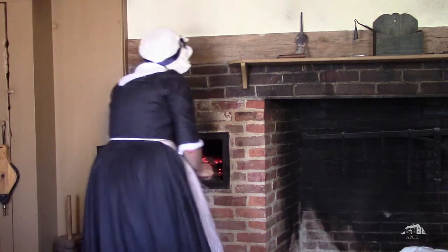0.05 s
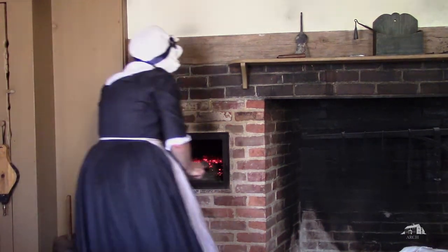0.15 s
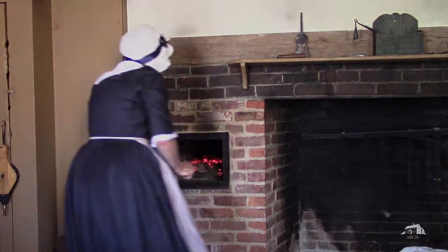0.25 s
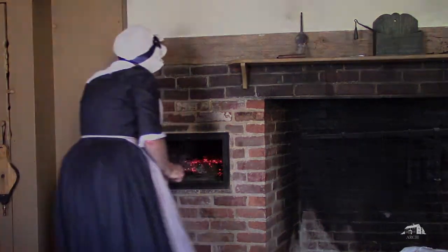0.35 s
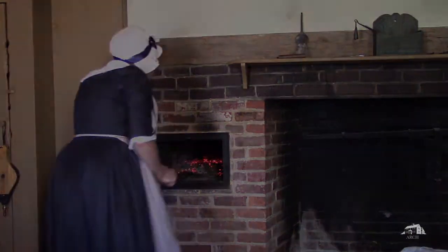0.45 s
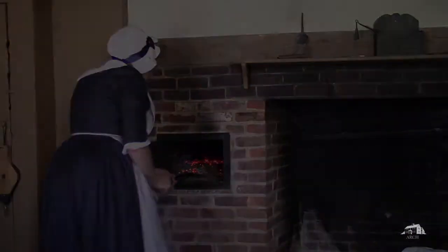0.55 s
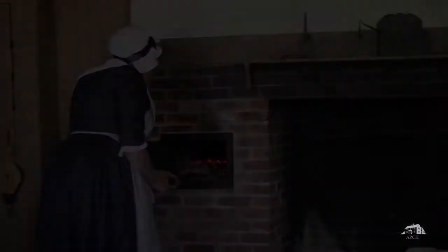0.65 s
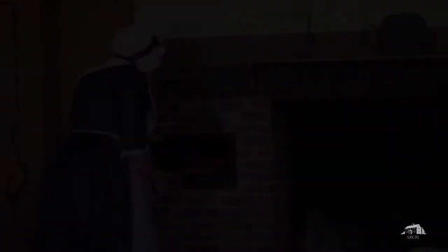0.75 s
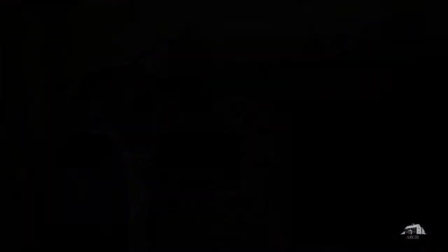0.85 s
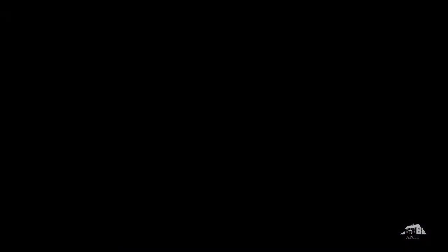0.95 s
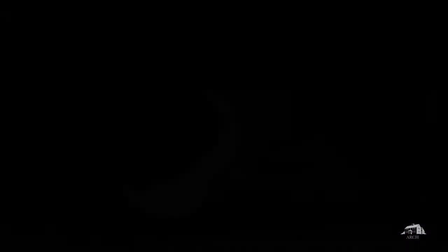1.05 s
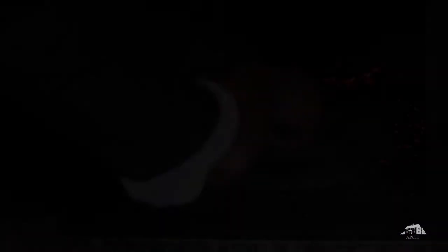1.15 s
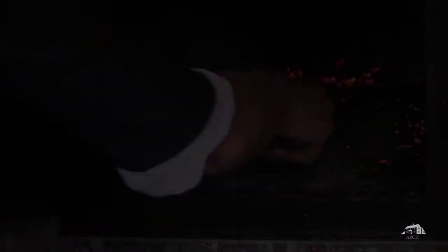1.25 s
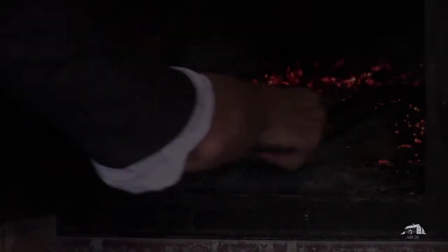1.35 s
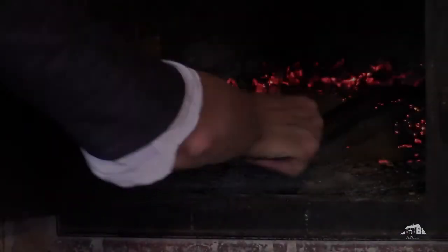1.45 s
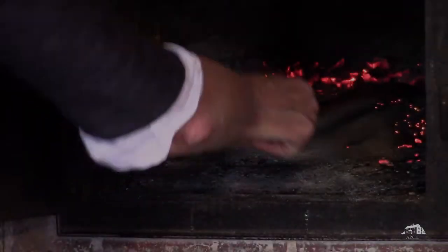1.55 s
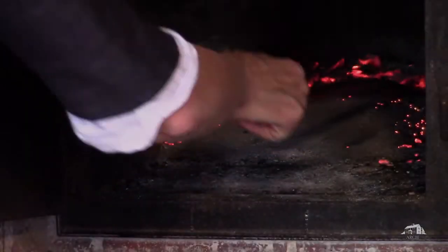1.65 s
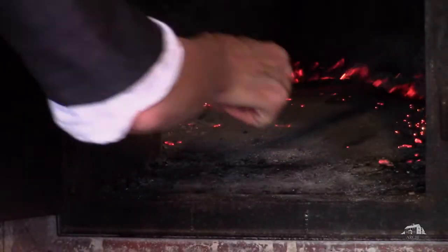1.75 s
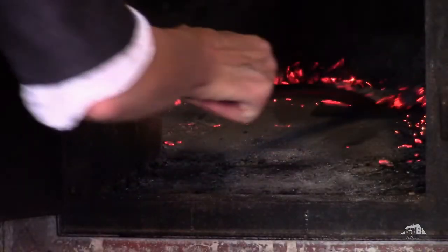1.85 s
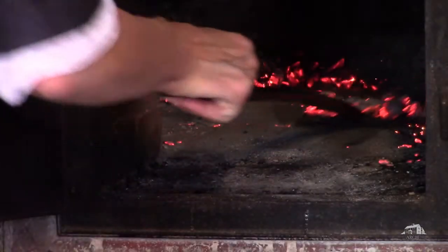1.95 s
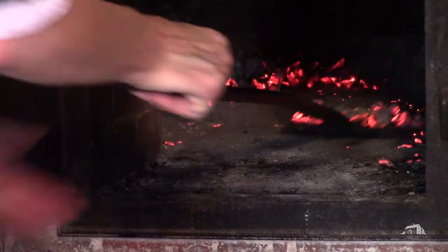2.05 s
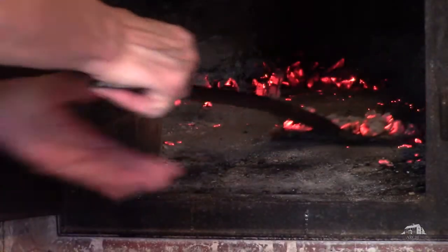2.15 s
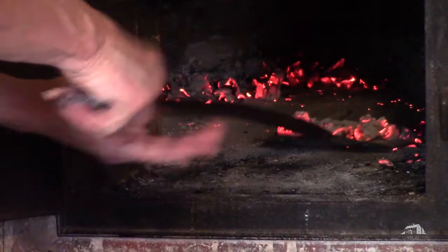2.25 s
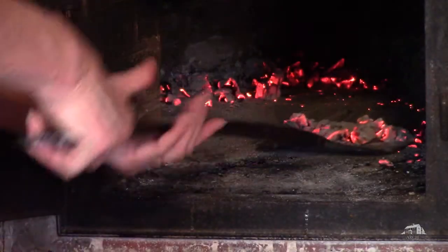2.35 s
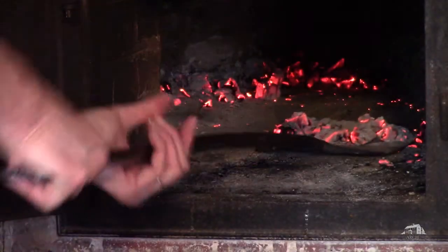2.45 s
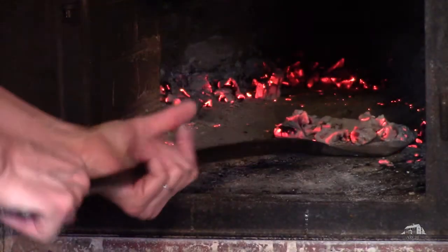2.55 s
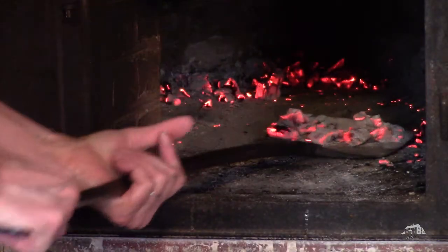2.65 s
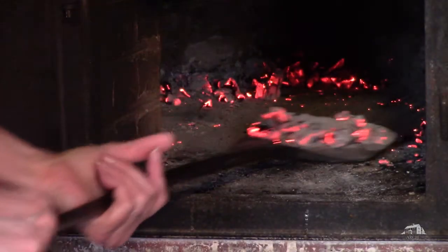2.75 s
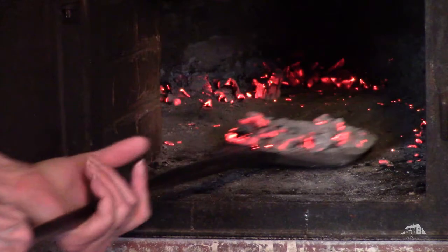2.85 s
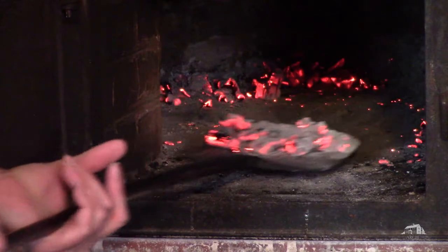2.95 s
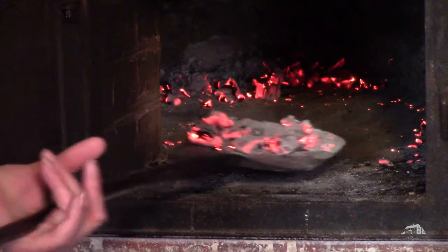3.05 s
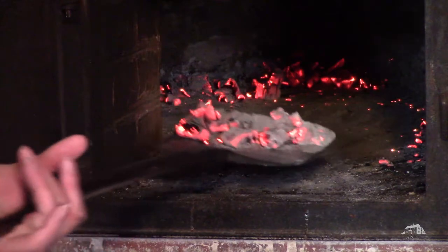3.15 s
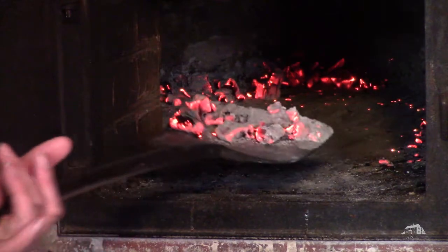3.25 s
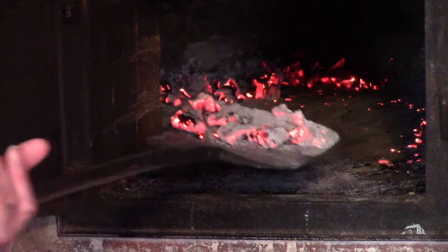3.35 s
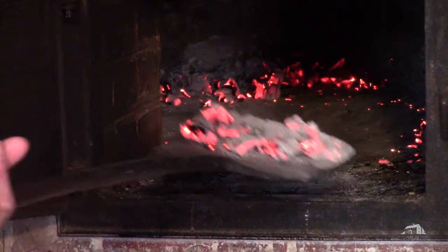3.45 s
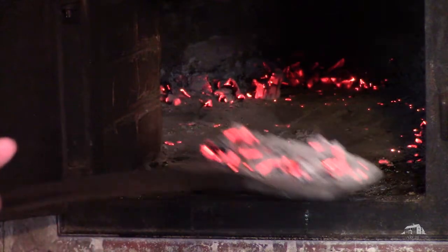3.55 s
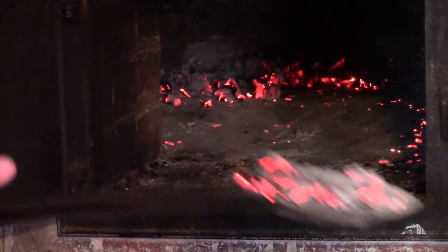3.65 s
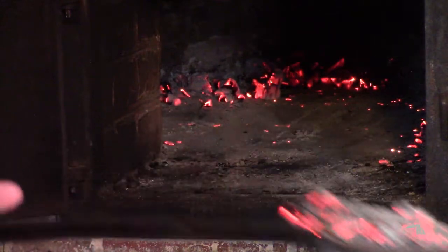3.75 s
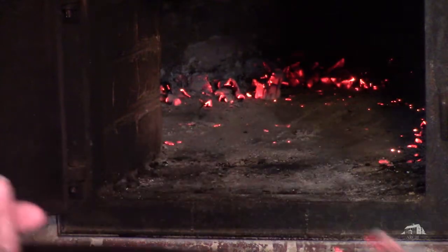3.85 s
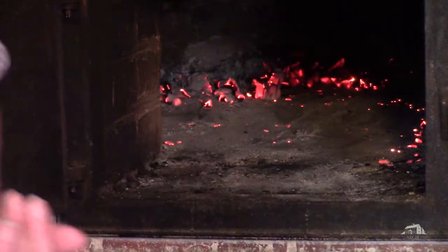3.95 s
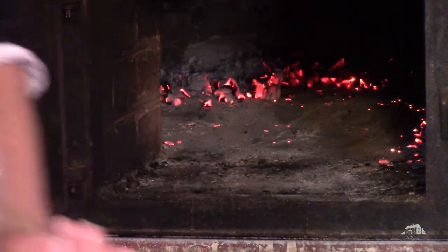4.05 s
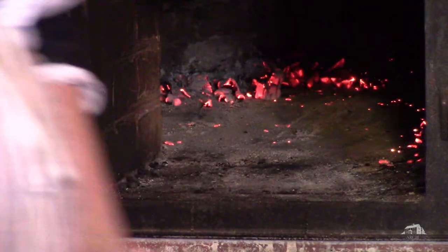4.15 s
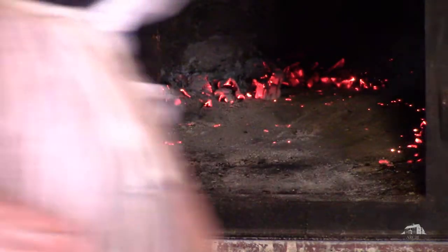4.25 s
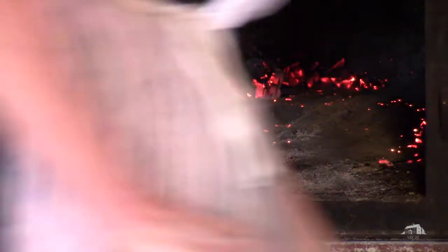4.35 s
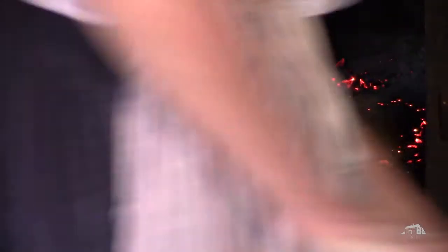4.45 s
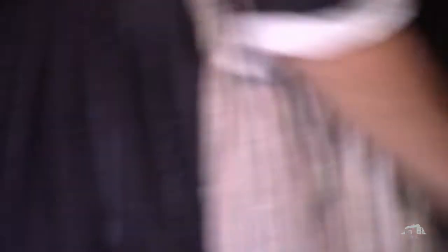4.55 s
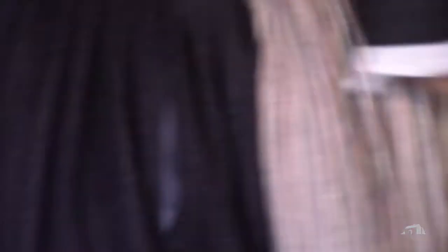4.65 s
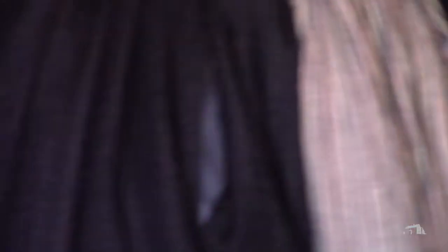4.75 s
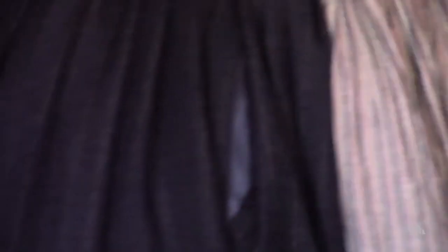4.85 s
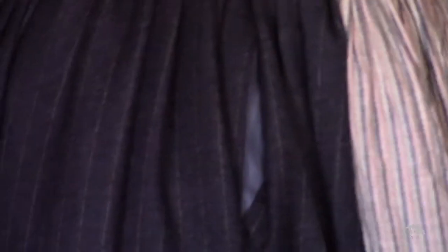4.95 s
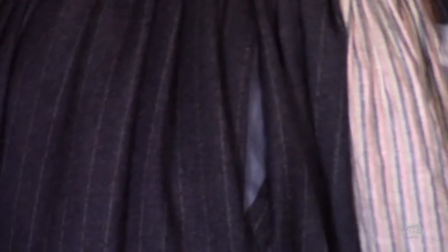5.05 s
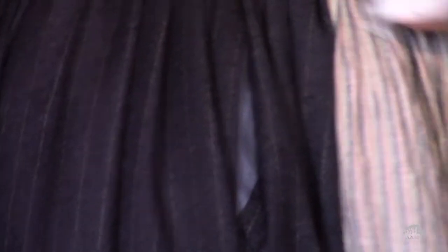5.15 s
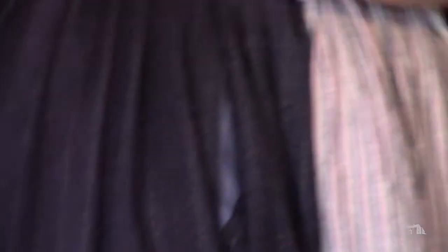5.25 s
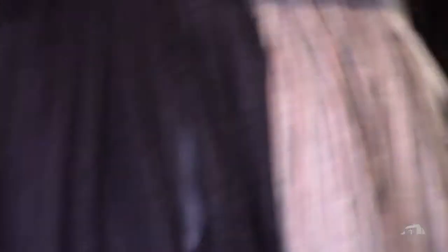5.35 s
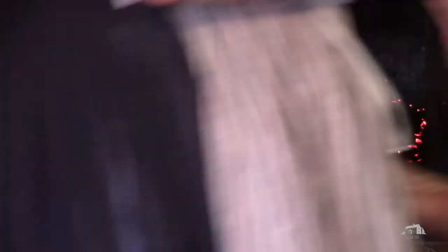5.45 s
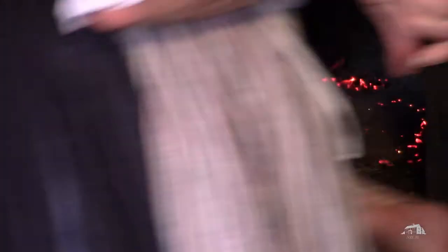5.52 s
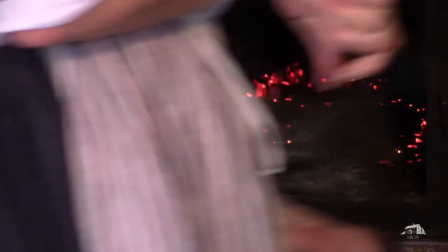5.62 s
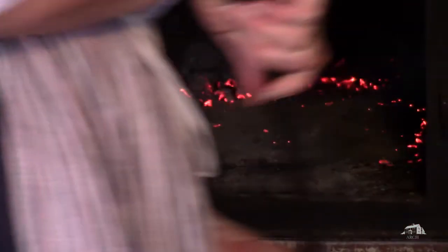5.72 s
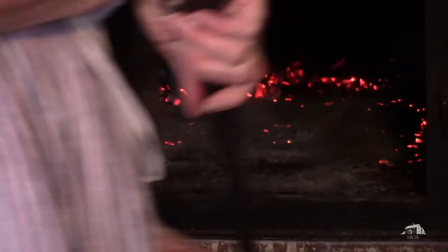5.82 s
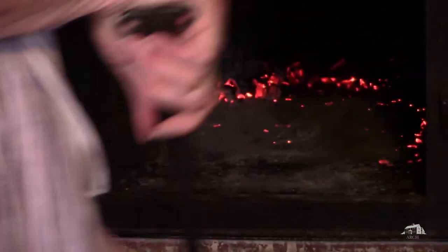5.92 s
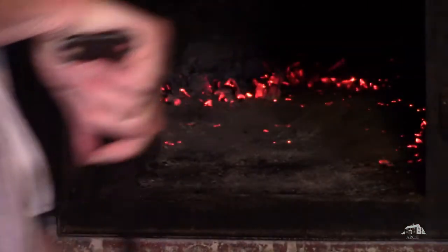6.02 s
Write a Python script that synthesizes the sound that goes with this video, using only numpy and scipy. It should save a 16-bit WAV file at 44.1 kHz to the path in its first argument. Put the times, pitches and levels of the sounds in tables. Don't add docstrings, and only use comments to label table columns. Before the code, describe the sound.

An iron peel bangs onto oven brick, scrapes grittily under hot coals in a long ringing shove, then footsteps thud and embers crackle.

```python
import sys
import numpy as np
from scipy import signal
from scipy.fft import rfft, irfft, next_fast_len
from scipy.io import wavfile
from scipy.ndimage import uniform_filter1d

SR = 44100
rng = np.random.default_rng(int(sys.argv[2]) if len(sys.argv) > 2 else 0)


def boost(x):
    u = np.asarray(x, float) / 20
    return 10 ** u


def store_pcm(level_fs):
    pcm = np.round(np.clip(level_fs, -1, 1) * 32767).astype(np.int16)
    wavfile.write(sys.argv[1], SR, np.atleast_2d(pcm).T)


N = 268128
LIFTED = 3 * SR
STRIDE = 6
RISE_DB = 20
LANDING_S = 0.003


def unit(x):
    return x / np.sqrt(np.mean(x ** 2) + 1e-20)


def along(points, hz):
    f, v = np.transpose(points)
    return np.interp(np.log(hz + 1), np.log(f + 1), v)


def wobble(rate_hz, size=N):
    knots = rng.standard_normal(int(size * rate_hz / SR) + 4)
    return np.interp(np.arange(size) * rate_hz / SR, np.arange(len(knots)), knots)


def coloured(x, points):
    m = next_fast_len(len(x) + 8192)
    gain = boost(along(points, np.fft.rfftfreq(m, 1 / SR)))
    return irfft(rfft(x, m) * gain, m)[:len(x)]


def resonate(x, hz, width_hz):
    b, a = signal.iirpeak(hz, hz / width_hz, SR)
    return signal.lfilter(b, a, signal.lfilter(b, a, x))


def no_bass(x, order, hz):
    return signal.sosfilt(signal.butter(order, hz, "high", fs=SR, output="sos"), x)


def grains(clump_db, spike_db, size=N):
    weight = boost(clump_db * wobble(250, size) + spike_db * rng.exponential(size=size))
    return unit(weight * rng.standard_normal(size))


def decay(length, t60_s):
    return boost(-60 * np.arange(length) / SR / max(t60_s, 1e-3))


def pushes(rows, size=N):
    s, db, rise, t60 = np.transpose(rows)[:4, :, None]
    t = np.arange(0, size, STRIDE) / SR
    age = t - s
    landed = np.where((rise < LANDING_S) & (s < s.T), s - rise, 0).max(0)[:, None]
    slope = np.where(age < 0, RISE_DB / np.maximum(rise, 1e-4), -60 / np.maximum(t60, 1e-3))
    level_db = np.where(t < landed, -150, np.maximum(db + slope * age, -150))
    power = boost(level_db) ** 2
    total = power.sum(0)
    return np.sqrt(total), power / total, np.maximum(age, 0)


# peak t/s, drag level/dB, rise/s, fade t60/s, weight on the brick/dB
PROBE_PUSHES = [(0.312, -21, 0.00091, 0.22, 1.5), (0.391, -30.5, 0.014, 0.62, -3.5),
                (0.689, -49, 0.017, 0.28, -22), (0.78, -54, 0.074, .1, -7),
                (0.874, -18.5, 0.002, 0.17, -13), (0.942, -27.5, 0.022, 0.21, -9.5),
                (1.0, -42, 0.022, 0.89, -2.5), (1.113, -38.5, .001, 0.47, -2.5),
                (1.176, -39, 0.022, 0.27, -2), (1.258, -49, 0.043, 0.71, -2),
                (1.442, -31, 0.0011, 0.033, -9), (1.601, -48.5, 0.12, 1.2, 11),
                (1.727, -36.5, 0.49, 0.25, -5.5), (1.805, -35.5, 0.14, 0.25, -0.5)]
# peak t/s, drag level/dB, rise/s, fade t60/s, weight on the brick/dB
SHOVE_PUSHES = [(1.811, -31.5, .001, 0.94, 1), (1.833, -29, 0.001, 0.56, 0.5), (1.847, -24, .012, .3, -10),
                (1.9, -31, 0.034, 0.63, -4.5), (1.992, -12, 0.00079, 0.077, -10.5),
                (2.002, -25, 0.0055, 1.37, -2), (2.077, -18, 0.11, 0.17, -7), (2.141, -14, 0.068, 0.07, -7),
                (2.15, -26.5, .02, 0.37, -3), (2.177, -20, .001, 0.71, -7),
                (2.355, -18.5, 0.27, 0.19, -3.5), (2.41, -32, 0.033, 0.45, -11),
                (2.569, -30.5, 0.00088, 0.1, -9), (2.648, -34, .001, .1, -19), (2.66, -37, 0.002, 0.15, -3),
                (2.684, -42, 0.022, .15, 1.5), (2.71, -49, .03, 0.24, 2)]
PEEL_PUSHES = PROBE_PUSHES + SHOVE_PUSHES


def contact():
    settle_db, settle_s = 3.5, 0.022
    keen_db, dull_db, dull_s = -8, -1, 0.005
    keen_per_weight = -0.37
    lift_s, lift_db_per_s = 2.86, 113
    effort, share, age = pushes(PEEL_PUSHES, LIFTED)
    push_weight_db = np.transpose(PEEL_PUSHES)[-1, :, None]
    settled_db = push_weight_db + settle_db * (1 - np.exp(-age / settle_s))
    weight_db = (share * settled_db).sum(0)
    dulled = (share * (1 - np.exp(-age / dull_s))).sum(0)
    edge_db = keen_db + keen_per_weight * weight_db + dull_db * dulled
    effort, weight_db, edge_db = np.repeat([effort, weight_db + 0.5, edge_db + 4.5], STRIDE, 1)
    since_lift_s = np.maximum(np.arange(LIFTED) / SR - lift_s, 0)
    return effort * boost(-lift_db_per_s * since_lift_s), weight_db, edge_db


def shade(hz, weight_db, edge_db):
    low = np.clip(np.log2(2600 / hz), 0, 1)
    high = np.clip(np.log2(hz / 7000) / 0.5, 0, 1)
    return low * weight_db + high * edge_db


# t/s, peak level/dB
BLADE_JOLTS = [(0.312, 2), (0.381, -25), (0.575, -29), (0.875, -5), (0.9365, -30), (1.039, -24),
               (1.0693, -29), (1.173, -16.5), (1.256, -25.5), (1.5838, -20.5), (1.8137, -12),
               (1.833, -11.5), (1.8466, 1.5), (1.945, -7), (2.038, -11), (2.057, -9), (2.068, -10),
               (2.097, -2), (2.125, -5.5), (2.178, -2.5), (2.578, -23), (2.661, -29)]
# f/Hz, level/dB
SHAFT_MODES = [(301, -16.5), (388, -15), (473, -8), (624, -10.5), (829, -15.5), (1082, -13.5), (1184, -8.5),
               (1345, -4), (1485, -7), (1679, -5.5), (1754, -1.5), (2062, -5), (2142, -10), (2282, -10),
               (2454, -7), (2616, -6.5), (2863, -8.5)]
BLADE_MODES = [(3025, -10), (3348, -6.5), (3757, -5), (3940, -6.5), (4231, -6.5), (4306, -10.5),
               (4715, -10), (5372, -11), (5673, -4.5), (5921, -6.5), (6029, -7), (6513, -33), (6664, -12),
               (6933, -12.5), (7181, -33), (7590, -10), (7930, -11), (8225, -36), (8559, -16.5),
               (8764, -12.5), (9216, -9.5), (9668, -11), (10023, -17.5), (10260, -31), (11111, -15),
               (11649, -16.5), (11983, -23), (13016, -19), (13320, -24), (14330, -26)]
RIM_MODES = [(10250, -17.5), (10620, -19), (11400, -36), (12400, -35), (13200, -34), (13740, -28),
             (14000, -29), (14944, -27), (15288, -27), (15430, -32), (12420, -25), (9000, -28),
             (4900, -12.5), (4695, -18.5)]
# f/Hz, density/dB per Hz
GRIT_SPECTRUM = [(200, -15), (400, -2), (1000, 5.5), (2500, -1.5), (5000, -4.5), (8000, -9), (11000, -10),
                 (16000, -37)]


def peel():
    effort, weight_db, edge_db = contact()
    drag = effort * boost(0.99 * wobble(34.99, LIFTED))
    knock = decay(SR // 8, 0.053)
    jolts = [(round(s * SR), boost(db - 16.0) * knock) for s, db in BLADE_JOLTS]

    grit = grains(clump_db=2.0, spike_db=1.36, size=LIFTED)
    ring = 0
    for hz, db in SHAFT_MODES + BLADE_MODES + RIM_MODES:
        coupling_db = np.minimum(3.6 * wobble(36.03, LIFTED), 4.5)
        push = drag * boost(coupling_db)
        for start, burst in jolts:
            push[start:][:len(burst)] += burst * boost(rng.normal(0, 1.9))
        force = push * boost(shade(hz, weight_db, edge_db)) * grit
        width_hz = 46 + 0.0053 * hz
        ring = ring + boost(db + 12.0) * resonate(force, hz, width_hz)

    push = drag.copy()
    for start, burst in jolts:
        push[start:][:len(burst)] += 2.17 * burst * decay(len(burst), 0.02)
    rasp = unit(coloured(grains(clump_db=4.0, spike_db=1.8, size=LIFTED), GRIT_SPECTRUM))
    low = coloured(rasp, [(1500, 0), (2600, -60)])
    high = coloured(rasp, [(7000, -60), (10000, 0)])
    rasp = rasp + low * (boost(weight_db) - 1) + high * (boost(edge_db) - 1)
    return np.pad(ring + boost(-7.0) * push * rasp, (0, N - LIFTED))


# peak t/s, rms level/dB, f/Hz, length/s
CATCH_SONGS = [(0.314, -20.5, 5680, 0.028), (0.325, -21, 516.6, 0.012), (0.326, -25, 1742, 0.059),
               (0.886, -32, 3940, 0.04), (0.878, -24, 2604, 0.013), (0.947, -32.5, 5680, 0.047),
               (0.963, -31, 3954, 0.041), (1.18, -38.5, 1668, 0.033), (1.181, -37.5, 820, 0.02),
               (1.597, -40, 4320, 0.034), (1.602, -45, 814, 0.1), (1.612, -46, 1180, 0.11),
               (1.624, -47.5, 1770, 0.17), (1.678, -42.5, 1462, 0.047), (1.845, -24.5, 1493, 0.048),
               (1.844, -22, 1753, 0.031), (1.86, -22.5, 5640, 0.042), (1.917, -34, 1724, 0.18),
               (1.999, -23, 5680, 0.02), (2.075, -17.5, 5670, 0.047), (2.08, -20.5, 3943, 0.042),
               (2.136, -22, 6540, 0.02), (2.181, -27, 5680, .021), (2.235, -33, 5950, 0.045),
               (2.302, -32.5, 4750, 0.082), (2.303, -30, 3320, .035), (2.351, -27.5, 8760, 0.026),
               (2.365, -29, 5940, 0.048), (2.366, -29.5, 4220, 0.056)]
# peak t/s, rms level/dB, f/Hz, length/s
MORE_SONGS = [(0.319, -22.5, 1327, 0.036), (0.32, -34, 2070, 0.056), (0.349, -36, 379, 0.045),
              (0.345, -24.5, 1340, 0.053), (0.397, -39.5, 5680, 0.049), (0.398, -41, 3940, 0.058),
              (1.839, -29, 1238, .03), (1.84, -33.5, 850, .025), (1.856, -30.5, 798, 0.06),
              (1.996, -29, 2290, 0.023), (2.037, -35, 750, 0.056), (2.106, -30, 1180, .03),
              (2.22, -32, 1294, 0.083), (2.26, -32.5, 1750, 0.07), (1.949, -33, 5650, 0.038),
              (2.131, -21, 8700, 0.016), (2.68, -49, 4300, 0.026), (0.526, -48.5, 7950, 0.025),
              (0.691, -52, 2630, 0.03), (0.702, -52, 476, .038), (0.935, -44, 309.3, 0.041),
              (1.333, -54.5, 828, 0.039), (1.465, -49.5, 2610, 0.041), (1.467, -54, 1330, 0.06),
              (1.781, -51, 822, 0.046), (2.586, -46, 4300, 0.045), (2.587, -43, 3020, 0.027),
              (2.664, -40, 6060, 0.035), (2.684, -47.5, 629, 0.055), (2.58, -45, 6000, 0.024),
              (2.415, -45, 2620, .04), (2.446, -48, 3050, 0.093), (2.429, -45, 440, 0.069),
              (2.448, -45, 1770, 0.045), (2.512, -47, 646, .03), (2.65, -47, 6040, 0.018),
              (2.67, -48.5, 630, 0.084), (2.691, -48, 1770, 0.056), (2.678, -47, 2620, .04),
              (2.73, -60.5, 4290, 0.08)]
# peak t/s, rms level/dB, f/Hz, length/s
PROBE_SONGS = [(0.319, -33, 4730, 0.074), (0.32, -31, 3160, 0.039), (0.323, -28, 2634, 0.024),
               (0.348, -28.5, 1770, 0.064), (0.388, -38, 2980, 0.032), (0.41, -37, 480, 0.05),
               (0.424, -43, 2590, 0.04), (0.429, -54, 4760, 0.088), (0.43, -51, 5900, 0.03),
               (0.434, -39, 1137, 0.033), (0.476, -49, 6950, 0.043), (0.546, -55, 2614, 0.099),
               (0.878, -37, 9670, 0.036), (0.874, -25.5, 5640, 0.041), (0.88, -41, 8170, 0.04),
               (0.883, -42, 9000, 0.024), (0.896, -41, 385.8, 0.064), (0.944, -37.5, 9690, 0.02),
               (0.948, -39, 2850, 0.036), (0.955, -50, 390, 0.12), (1.115, -47, 3020, 0.024),
               (1.129, -48.5, 1083, 0.05), (1.15, -44, 836, 0.057), (1.192, -51, 300, 0.055),
               (1.21, -43, 1673, 0.042), (1.447, -52.5, 470, 0.062), (1.591, -52, 8230, 0.046),
               (1.6, -42, 1630, 0.051), (1.675, -46, 1782, 0.054), (1.7, -50, 3750, 0.088),
               (1.723, -48, 2990, 0.18), (1.724, -52, 10000, 0.04), (1.726, -52, 810, 0.1),
               (1.739, -43, 1767, 0.037), (1.746, -39, 1470, 0.027)]
# peak t/s, rms level/dB, f/Hz, length/s
SHOVE_SONGS = [(1.843, -36, 6840, 0.048), (1.847, -26, 3770, 0.026), (1.854, -33, 4700, 0.056),
               (1.856, -32, 5960, 0.024), (1.86, -30.5, 3020, 0.051), (1.87, -26.5, 1343, 0.036),
               (1.902, -34.5, 2566, 0.064), (1.941, -31.5, 1130, 0.048), (1.947, -35, 2290, 0.057),
               (1.949, -39.5, 3030, 0.096), (1.961, -41.5, 756, 0.095), (1.984, -33.5, 1110, 0.024),
               (1.993, -34, 1520, 0.062), (2.0, -40, 6560, 0.04), (2.002, -37, 7600, 0.028),
               (1.999, -30.5, 6670, 0.032), (2.037, -33.5, 1273, 0.085), (2.04, -33, 3210, 0.037),
               (2.061, -32, 9220, 0.024), (2.063, -27, 6930, 0.041), (2.066, -27, 5450, 0.039),
               (2.073, -23, 4700, 0.024), (2.087, -33.5, 8700, 0.04), (2.103, -26.5, 3210, 0.039),
               (2.105, -23.5, 6440, 0.03), (2.112, -33.5, 1895, 0.077), (2.113, -31, 7900, 0.043),
               (2.13, -42, 11090, 0.044), (2.133, -27, 5710, 0.039), (2.185, -43, 8900, 0.036),
               (2.203, -32, 3930, 0.056), (2.215, -33, 2280, 0.1), (2.22, -37, 2570, 0.062),
               (2.235, -37, 10030, 0.026), (2.243, -40, 6510, 0.07), (2.25, -37, 7170, 0.04),
               (2.288, -34, 460, 0.06), (2.29, -35.5, 2460, 0.18), (2.307, -40, 9650, 0.064),
               (2.31, -36.5, 9010, 0.024), (2.322, -38, 6540, 0.07), (2.325, -39, 10260, 0.07),
               (2.323, -36, 449.3, 0.065), (2.333, -39, 7180, 0.062), (2.36, -37, 10250, 0.032),
               (2.351, -29, 4900, 0.018), (2.36, -38, 8990, 0.032), (2.363, -39, 2060, 0.044),
               (2.35, -33.5, 2460, 0.064), (2.372, -36, 1760, 0.046)]


def chatter():
    out, t = np.zeros(LIFTED), np.arange(LIFTED) / SR
    waver_rad = 1.63 * wobble(50, LIFTED)
    flutter = boost(2.1 * wobble(90, LIFTED))
    rattle = boost(2.25 * wobble(170, LIFTED))
    landings_s = [row[0] for row in PEEL_PUSHES if row[2] < LANDING_S]
    for s, db, hz, length_s in CATCH_SONGS + MORE_SONGS + PROBE_SONGS + SHOVE_SONGS:
        landed_s = max(x for x in landings_s if x < s + 0.008)
        near = slice(round(max(s - 0.1, landed_s) * SR), round((s + 0.19) * SR))
        u = (t[near] - s) / length_s
        swell = np.where(u < 0, np.exp(-(u / 0.35) ** 2), boost(-9 * u - 26 * u * u))
        unsteady = (flutter if hz > 3500 else rattle)[near]
        tone = np.sin(2 * np.pi * hz * t[near] + waver_rad[near])
        out[near] += boost(db + 2.0) * swell * unsteady * tone
    return np.pad(out, (0, N - LIFTED))


# peak t/s, level/dB, rise/s, fade t60/s, body/dB
COAL_SPILLS = [(0.0, -33, .001, 0.3, 4.5), (0.268, -38.5, 0.036, 0.25, -4.5), (0.3, -45, .005, .1, -20),
               (3.2, -51, 0.02, .08, -25), (4.536, -49.5, 0.14, 0.14, -24), (4.632, -49.5, 0.061, 0.19, 3),
               (4.742, -48.5, 0.026, 0.54, -12), (4.804, -38, 0.0009, 0.52, -1),
               (4.82, -32, 0.016, 0.29, 0.5), (4.882, -34.5, 0.47, 0.28, 1), (4.996, -48, 0.073, 0.78, -7),
               (5.346, -52, 0.16, 0.088, -18), (5.684, -48.5, 0.49, 0.28, 2.5),
               (5.77, -57.5, .015, 0.9, 6.5)]
# f/Hz, density/dB per Hz
COAL_SPECTRUM = [(120, -17), (200, -8), (482, 1), (569, -2.5), (1120, 2.5), (2960, -3.5), (10700, -10),
                 (16000, -27)]


def coals():
    level, share, _ = pushes(COAL_SPILLS)
    body_db = np.transpose(COAL_SPILLS)[-1] @ share
    level, body_db = np.repeat([level, body_db], STRIDE, 1)
    crackle = unit(coloured(grains(clump_db=3.0, spike_db=2.0), COAL_SPECTRUM))
    body = coloured(crackle, [(1800, 0), (3000, -60)])
    return level * boost(-5.0) * (crackle + body * (boost(body_db - 1.5) - 1))


# t/s, peak level/dB, f/Hz, body under it/dB
EMBER_TICKS = [(0.203, -24, 8600, -24), (0.7977, -30, 11500, -22), (1.2994, -44, 4530, -10),
               (3.187, -43, 9000, -40), (3.198, -40.5, 8500, -40), (3.203, -43, 11000, -40),
               (3.251, -41, 8000, -35), (3.4074, -33.5, 5930, -38), (3.7894, -48, 13200, -14),
               (4.174, -34, 10700, -64), (4.374, -42, 13200, -60), (4.6897, -41, 13200, -6),
               (4.809, -22.5, 7800, -7), (4.818, -18, 9000, -18), (4.824, -25, 4490, -11),
               (4.8436, -24, 5000, -9), (4.856, -27, 4500, -3), (4.859, -24.5, 4500, -7),
               (4.8775, -22, 6160, -16), (4.886, -19, 8040, -18), (4.9835, -36.5, 8000, -12),
               (4.987, -34, 5000, -8), (5.011, -45, 12500, -40), (5.018, -44, 12500, -40),
               (5.024, -46, 12000, -40), (5.067, -37.5, 4710, -22), (5.1558, -37, 8200, -28),
               (5.159, -32, 11400, -31), (5.163, -47, 5040, -26), (5.196, -30, 6620, -40),
               (5.199, -37, 8000, -33), (5.205, -31.5, 11200, -35), (5.211, -37, 9000, -30),
               (5.3122, -40, 6300, -17), (5.4198, -35, 6860, -1), (5.602, -44, 11200, -30),
               (5.714, -29.5, 8650, -34), (5.7676, -38, 7760, -23), (5.78, -40, 6170, -26)]
# t/s, peak level/dB, f/Hz, body under it/dB
COAL_CRACK = [
    (0.606, -18.5, 4270, -5),
    (0.6078, -20, 3040, -5),
    (0.6095, -27, 2680, -13),
]


def embers():
    out, t = np.zeros(N + SR), np.arange(SR // 16) / SR
    dulls_db = -12
    fade = decay(len(t), 0.044)
    snap = decay(len(t), 0.0072) + boost(-10) * fade
    for s, db, hz, body_db in EMBER_TICKS + COAL_CRACK:
        band = [(700, body_db - 3), (3000, body_db + 12.0),
                (0.64 * hz, -4.5 + 0.35 * min(body_db + 28, 0)), (hz, 0), (1.2 * hz, -3),
                (16500, -4 + dulls_db * np.log2(16500 / hz))]
        crack = unit(coloured(rng.standard_normal(len(t)), sorted(band))) * snap
        rings = 7000 < hz < 11000
        glass = 0.25 * rings * np.sin(2 * np.pi * hz * t) * fade
        out[round(s * SR):][:len(t)] += boost(db - 8.5) * (crack + glass)
    return out[:N]


# t/s, peak level/dB, board f/Hz, slap/dB, t60/s
HEEL_STEPS = [(0.004, -33, 703, -8, 0.32), (0.024, -23.5, 444, -13, 0.25), (0.692, -46, 470, -16, 0.23),
              (0.875, -40, 364, -20, 0.52), (2.924, -44, 707, -10, 0.33), (4.256, -25, 445, -8.5, 0.18),
              (4.271, -29.5, 513, -29, 0.15), (4.345, -32.5, 454, 8.5, 0.16), (4.366, -40, 477, 5, 0.3),
              (5.37, -30.5, 292, 5.5, 0.11), (5.376, -26.5, 300, -20, 0.076), (5.394, -32, 305, -1.5, 0.18),
              (5.558, -35.5, 302, -14, 0.12)]
# t/s, peak level/dB, board f/Hz, slap/dB, t60/s
WEIGHT_SHUFFLE = [
    (5.585, -38, 446, -30, 0.14),
    (5.6, -39, 199, -30, 0.17),
]
# f/Hz, density/dB per Hz
BOARD_SPECTRUM = [(59, -73), (100, -16), (160, -9), (312, 2), (506, -3.5), (563, 2), (1300, -15.5),
                  (1690, -57), (2860, -120)]
SLAP_SPECTRUM = [(500, -16), (1050, -2), (1500, 3), (2100, -4), (3200, -10.5), (6000, -21), (12000, -34)]


def feet():
    out, n = np.zeros(N + SR), SR // 4
    rise, slap_rise = 1 - decay(n, 0.0096), 1 - decay(n, 0.03)
    for s, db, board_hz, slap_db, t60_s in HEEL_STEPS + WEIGHT_SHUFFLE:
        floor = unit(coloured(rng.standard_normal(n), BOARD_SPECTRUM))
        board = unit(resonate(np.tile(rng.standard_normal(n), 2), board_hz, 163)[n:])
        boom = (floor + 1.15 * board) * rise * decay(n, t60_s)
        slap_fade = decay(n, 0.36 * t60_s) + 0.45 * decay(n, t60_s)
        slap = unit(coloured(rng.standard_normal(n), SLAP_SPECTRUM)) * slap_rise * slap_fade
        thud = boom / np.abs(boom).max() + boost(slap_db - 7.0) * slap
        out[round(s * SR):][:n] += boost(db - 1.5) * thud
    return out[:N]


# f/Hz, t60/s
KITCHEN_T60 = [(200, 0.59), (1400, 0.4), (4000, 0.22), (12000, 0.059)]


def kitchen(x):
    hz, t, z = signal.stft(rng.standard_normal(SR // 2), SR, nperseg=256)
    fade = boost(-60 * t / along(KITCHEN_T60, hz)[:, None])
    tail = signal.istft(z * fade, SR, nperseg=256)[1]
    delayed = np.pad(x, (250, 0))
    return signal.fftconvolve(delayed, tail / np.linalg.norm(tail))[:N]


# f/Hz, density/dB per Hz
AIR_SPECTRUM = [(20, -16), (100, -19), (170, -10), (300, -6.5), (600, -3), (750, -4), (950, -1), (1240, -7),
                (1600, -5), (2200, -10), (5000, -13.5), (10000, -18), (14500, -24.5), (16500, -30)]


def hush():
    level_db = -57 + 0.6 * wobble(3)
    return boost(level_db) * unit(coloured(rng.standard_normal(N), AIR_SPECTRUM))


def scene():
    iron = no_bass(peel(), 6, 265)
    song = no_bass(chatter(), 4, 220)
    sparks = no_bass(coals() + embers(), 4, 250)
    thuds = no_bass(feet(), 5, 150)
    wet = kitchen(boost(-8) * iron + boost(-9.5) * song + boost(-13.0) * sparks + boost(-10.5) * thuds)
    mono = iron + song + sparks + thuds + wet + hush()
    return np.array([mono, mono])


def band_limit(x):
    return signal.sosfilt(signal.butter(12, 15760, fs=SR, output="sos"), x)


def record(dry):
    own = [(60, -66), (250, -82), (600, -90), (16000, -100)]  # f/Hz, level/dB
    treble = [(4000, -70), (6000, -44), (10000, -25), (14000, -13)]  # f/Hz, gain/dB
    loudness = np.clip(uniform_filter1d(np.abs(dry[0]), 2048) / 0.03, 0, 1)
    apart = coloured(dry[0], treble) * wobble(900) * loudness
    mics = np.array([x + sign * apart + coloured(rng.standard_normal(N), own)
                     for x, sign in zip(dry, (1, -1))])
    mix = mics / (1 + np.abs(mics / 0.56) ** 8) ** (1 / 8)
    return band_limit(mix)


dry = scene()
out = record(dry)
store_pcm(out)
```